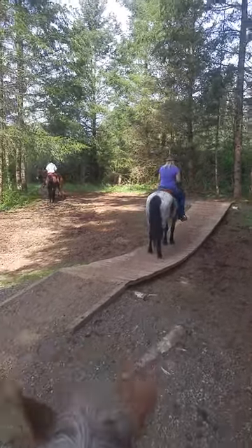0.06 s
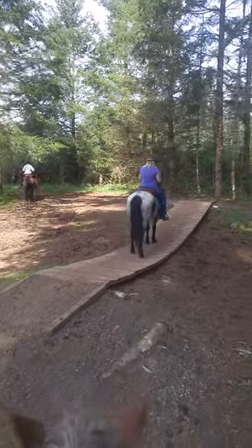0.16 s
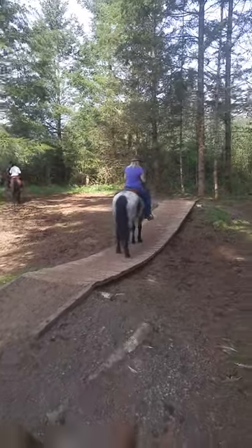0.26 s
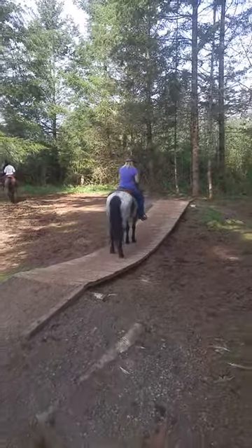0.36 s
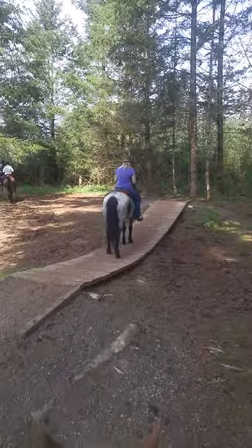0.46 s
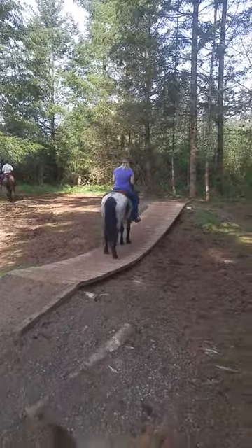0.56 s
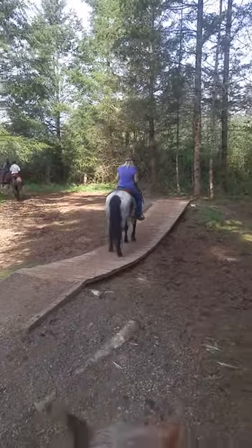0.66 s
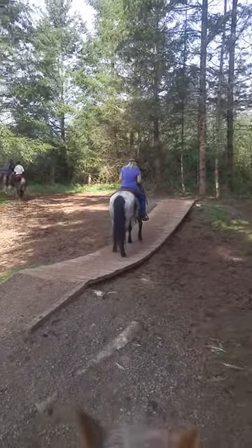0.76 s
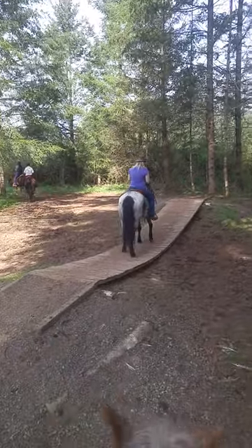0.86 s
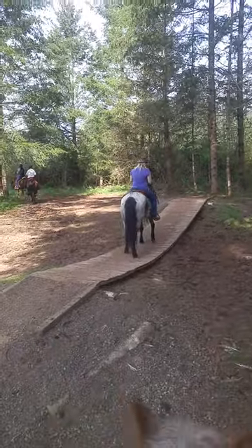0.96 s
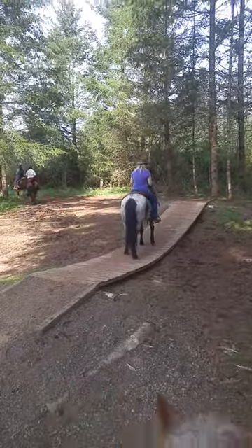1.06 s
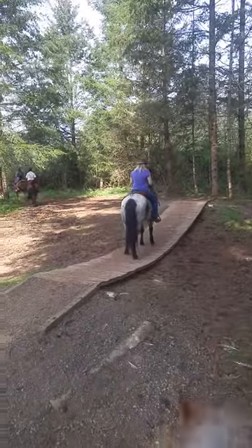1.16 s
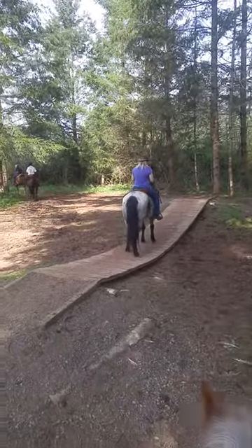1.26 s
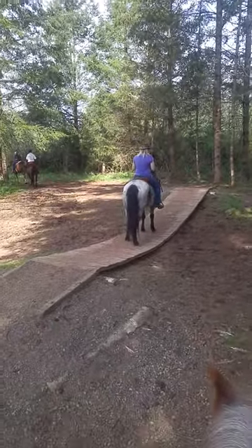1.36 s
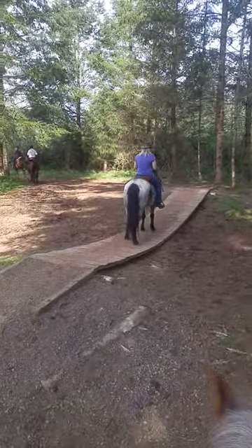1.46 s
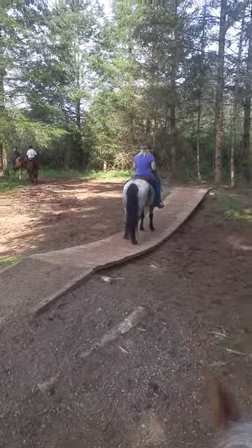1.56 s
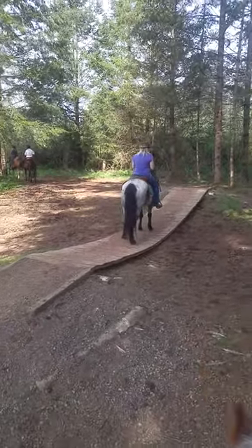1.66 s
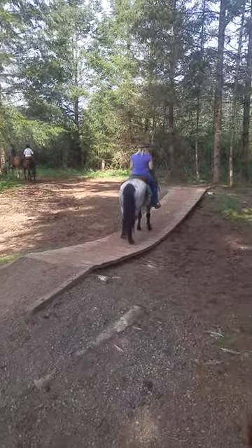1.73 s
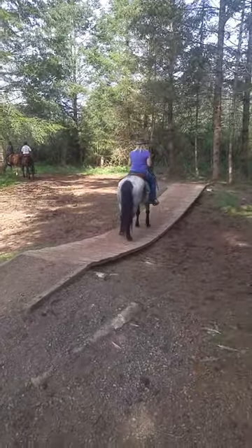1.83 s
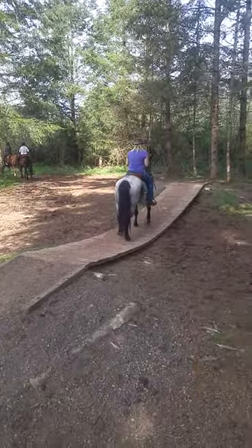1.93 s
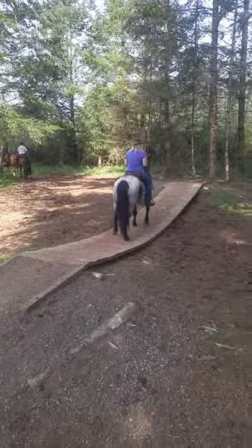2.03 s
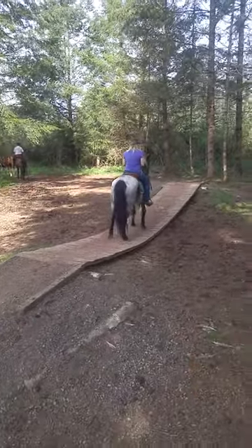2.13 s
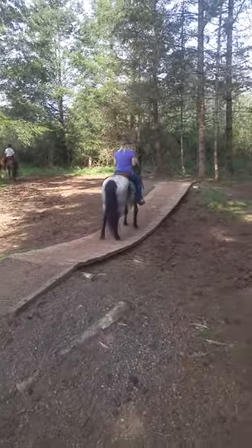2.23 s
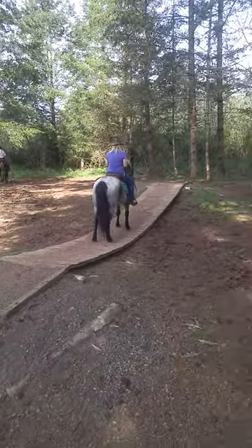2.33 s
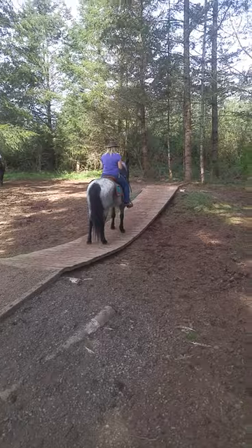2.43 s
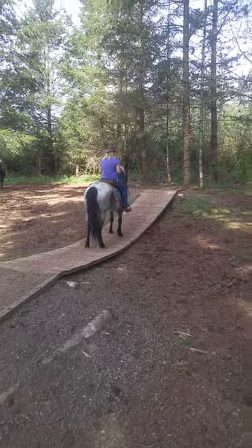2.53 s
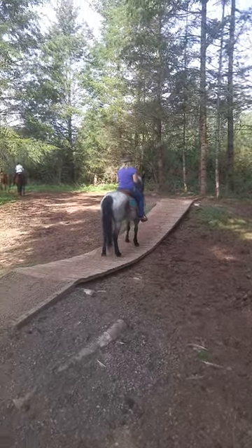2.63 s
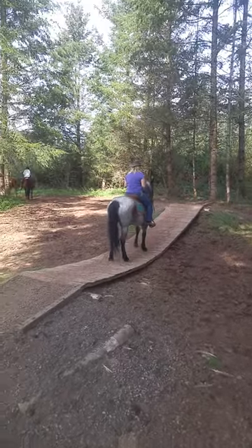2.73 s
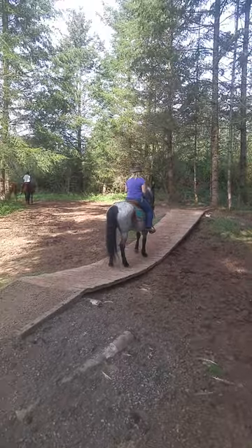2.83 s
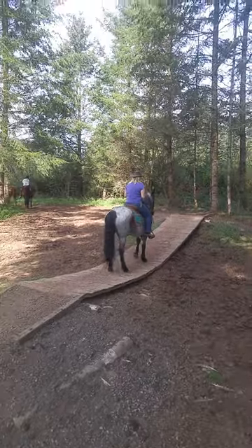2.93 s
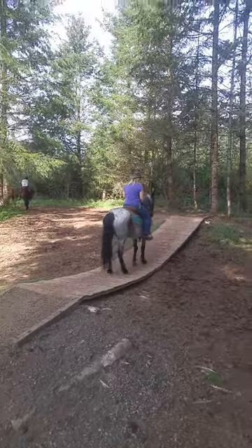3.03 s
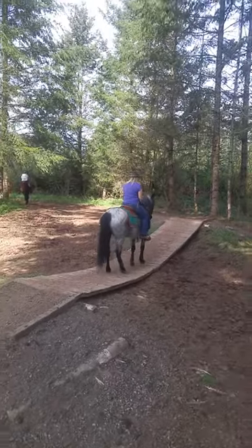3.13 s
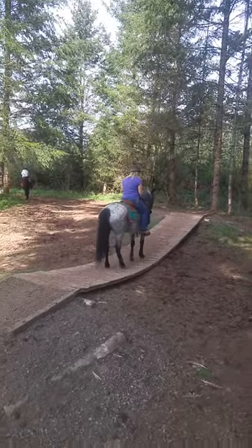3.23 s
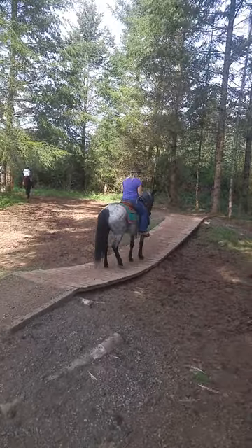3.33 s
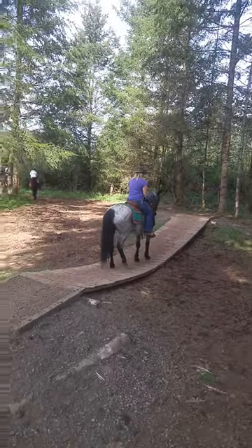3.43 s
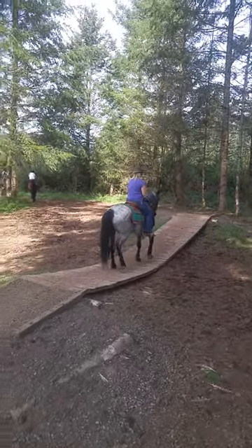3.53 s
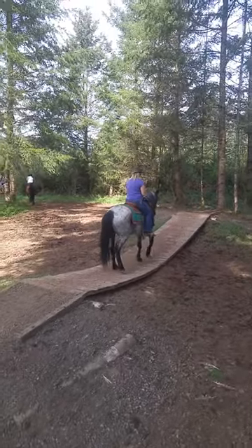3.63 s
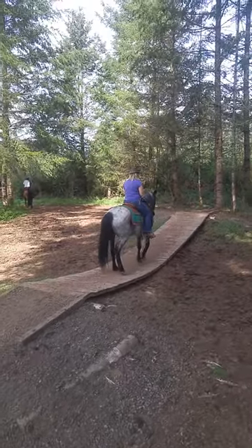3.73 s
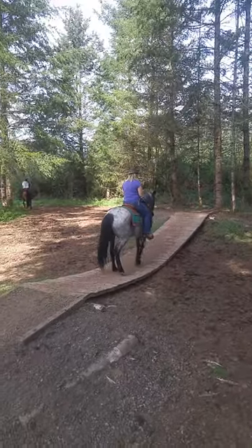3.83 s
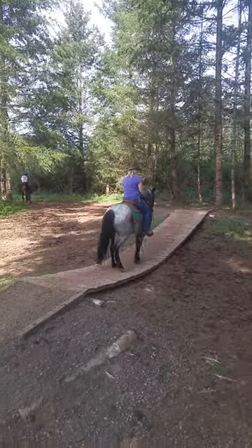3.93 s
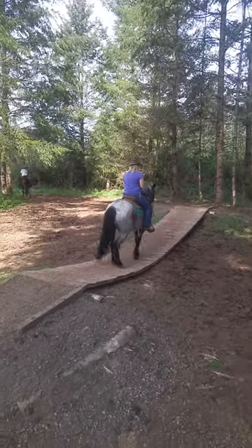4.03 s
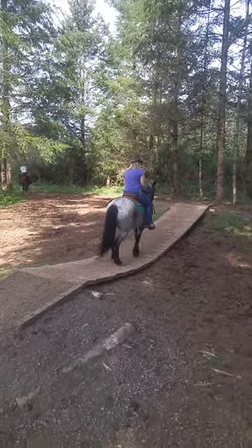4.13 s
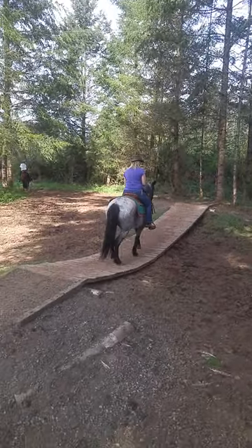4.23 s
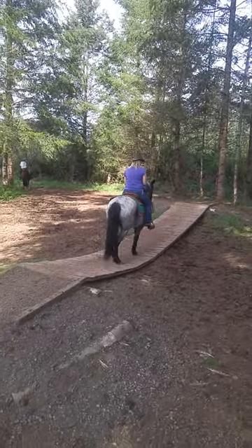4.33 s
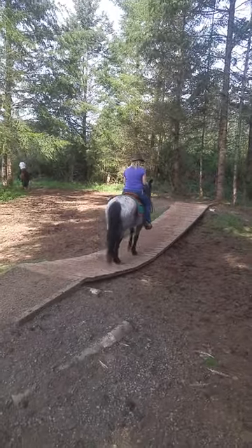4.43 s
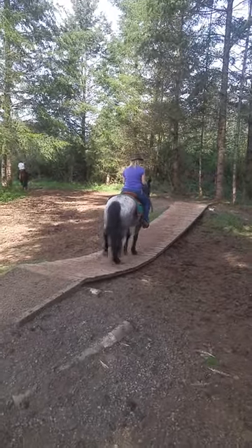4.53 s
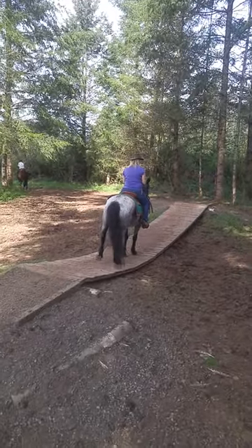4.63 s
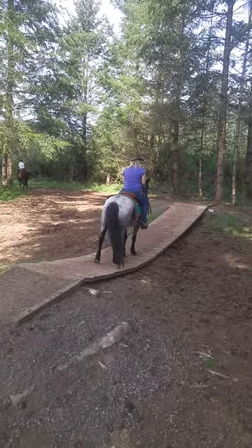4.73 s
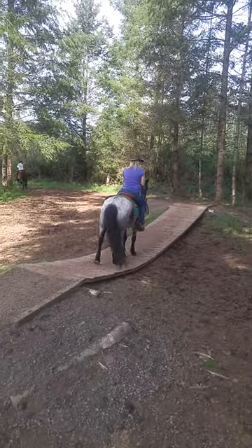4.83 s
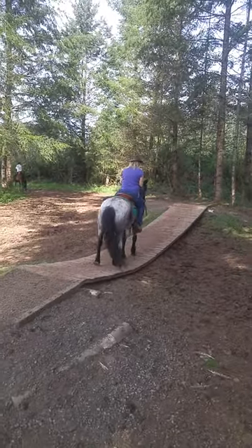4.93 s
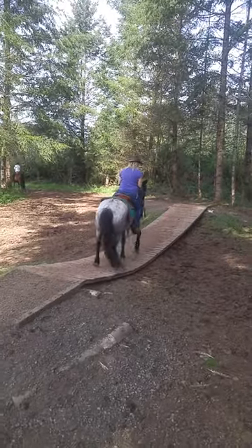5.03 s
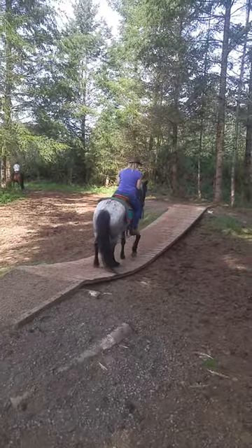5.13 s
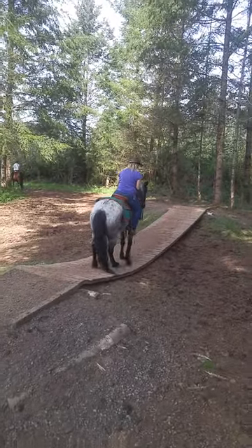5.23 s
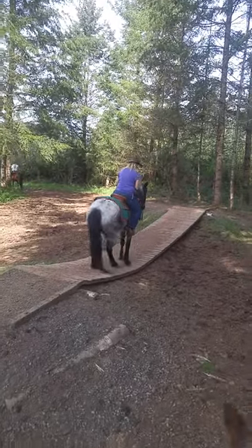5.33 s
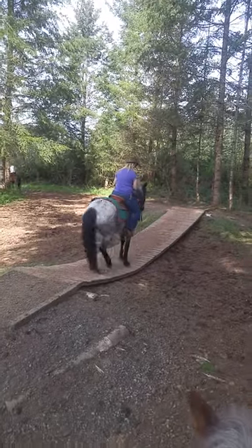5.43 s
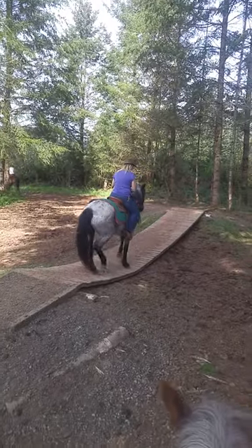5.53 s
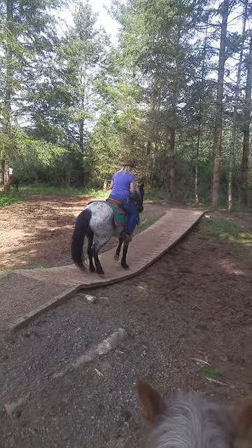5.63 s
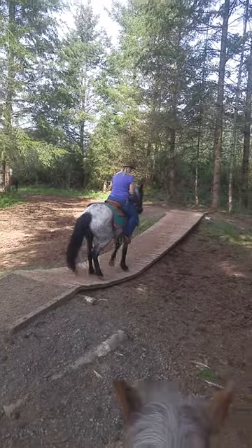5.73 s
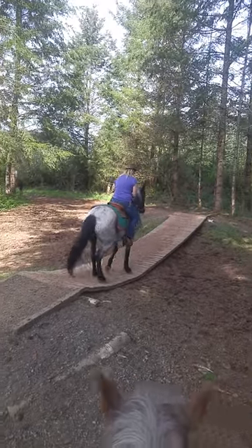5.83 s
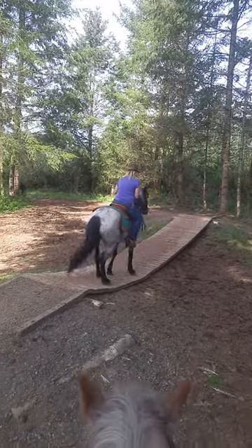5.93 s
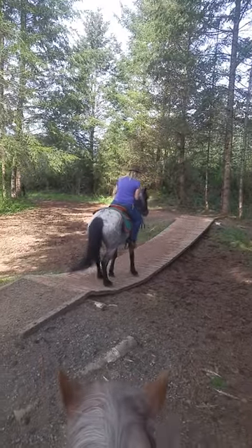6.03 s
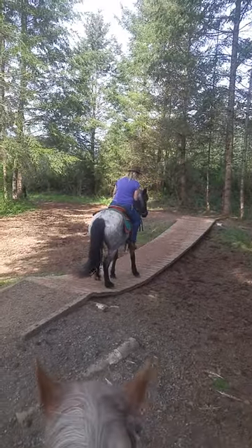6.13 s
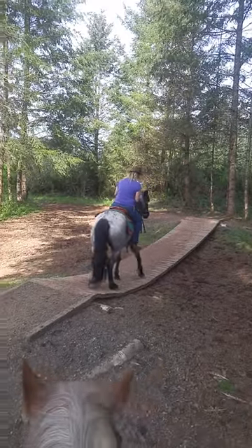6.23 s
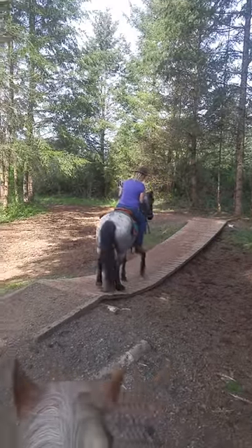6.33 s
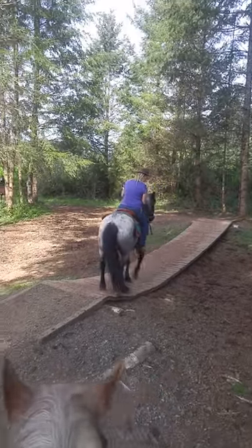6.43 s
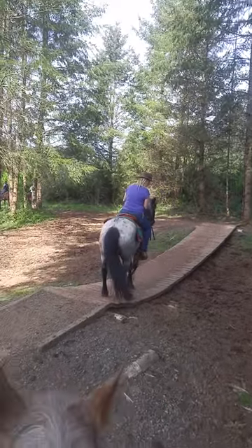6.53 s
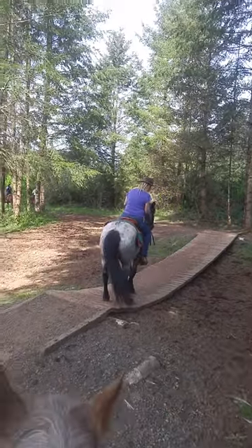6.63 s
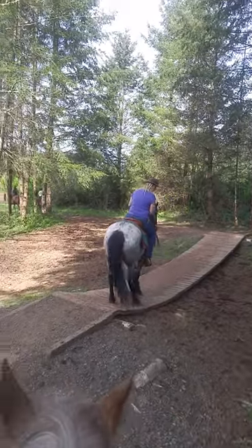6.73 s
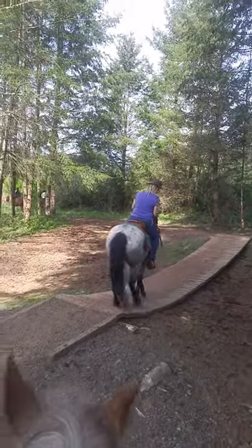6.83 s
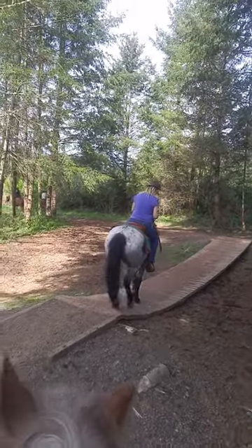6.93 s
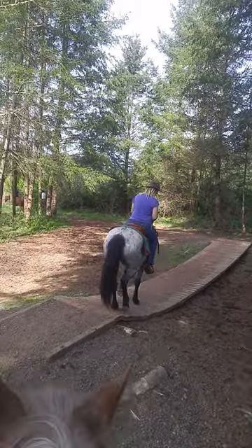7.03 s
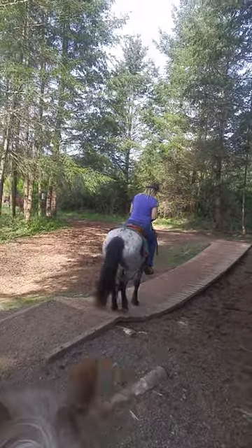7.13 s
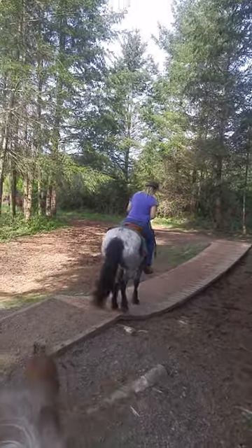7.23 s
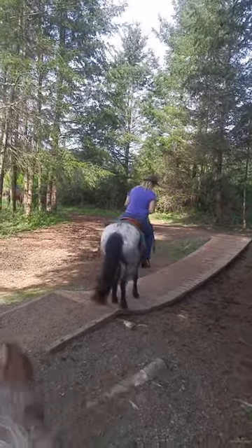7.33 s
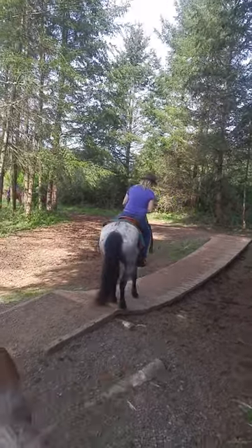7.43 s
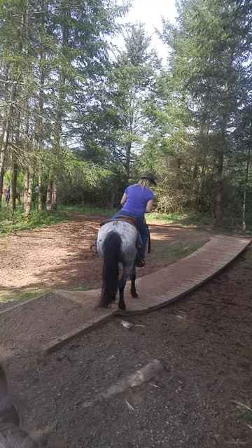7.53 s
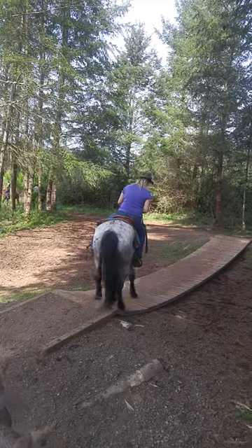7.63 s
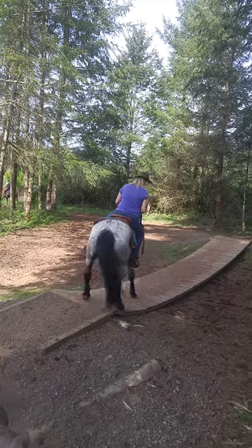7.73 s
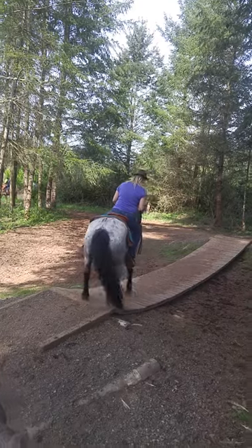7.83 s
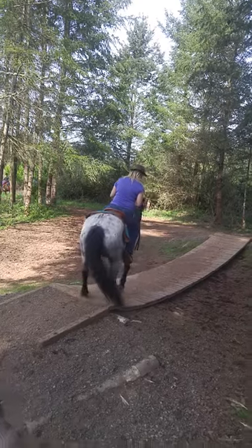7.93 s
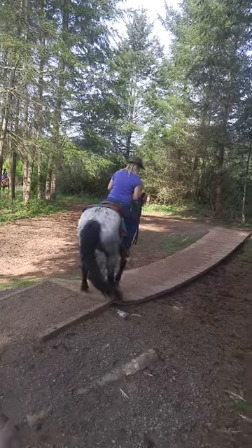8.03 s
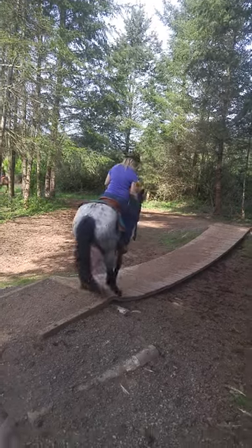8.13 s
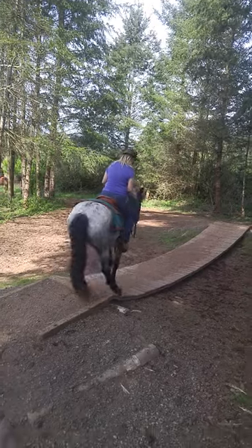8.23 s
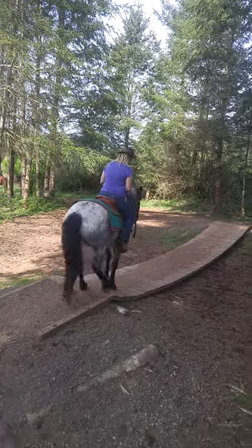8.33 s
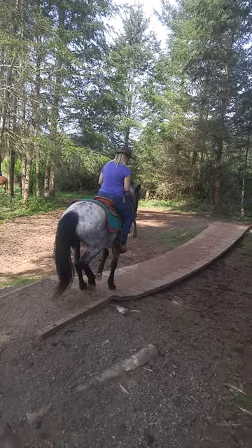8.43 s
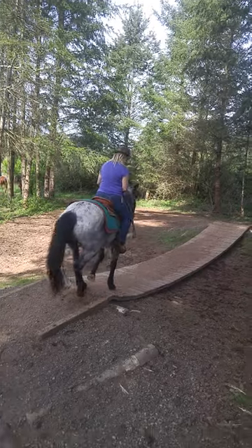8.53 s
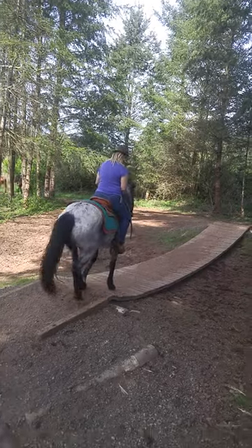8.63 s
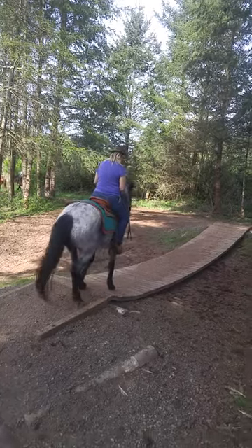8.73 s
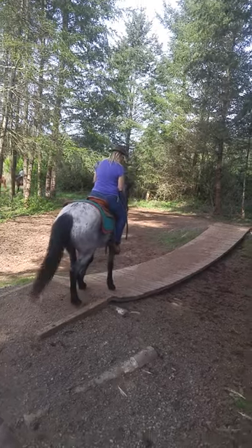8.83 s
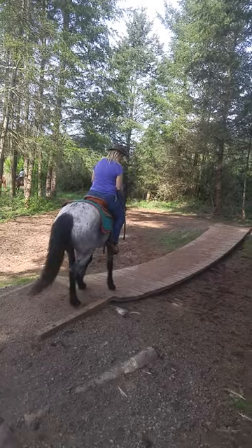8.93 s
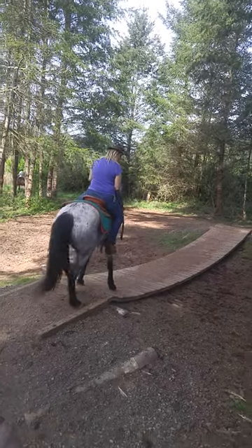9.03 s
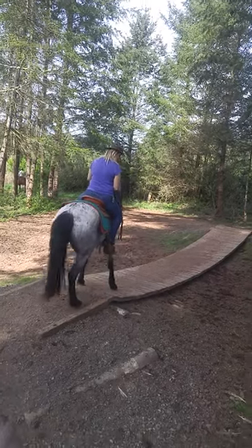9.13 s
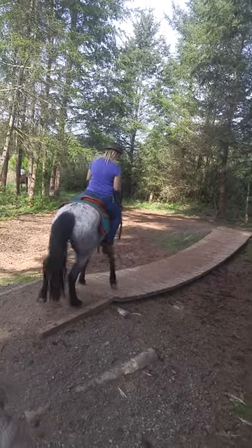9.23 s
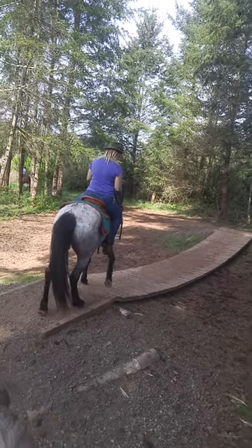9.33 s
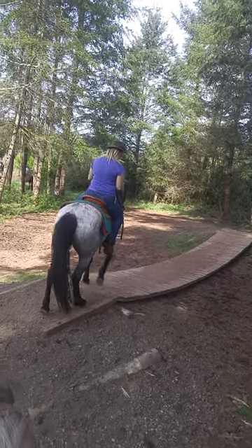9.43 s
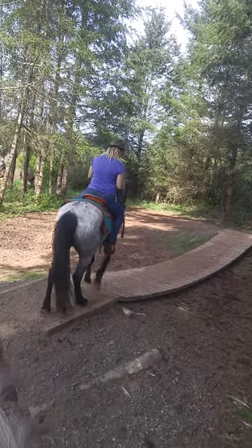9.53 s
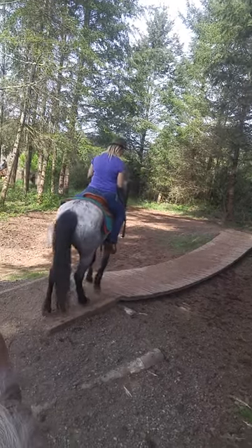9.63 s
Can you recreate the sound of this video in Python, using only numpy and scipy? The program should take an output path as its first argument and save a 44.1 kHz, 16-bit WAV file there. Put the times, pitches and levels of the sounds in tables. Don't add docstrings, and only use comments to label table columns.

```python
import sys
import numpy as np
from scipy import signal
from scipy.io import wavfile

SR = 44100
rng = np.random.default_rng(int(sys.argv[2]) if len(sys.argv) > 2 else 0)


def magnitude_from_level(level_db):
    exponent = np.asarray(level_db, float) / 20
    return 10 ** exponent


def inscribe(sig):
    pcm = np.round(np.clip(np.atleast_2d(sig).T, -1, 1) * 32767)
    wavfile.write(sys.argv[1], SR, pcm.astype(np.int16))


N = 426518


def unit(x):
    return x / np.sqrt(np.mean(x ** 2) + 1e-20)


def in_time(rows, **ends):
    s, *columns = np.transpose(rows)
    return [np.interp(np.arange(N) / SR, s, c, **ends) for c in columns]


def at_hz(points, hz):
    points_hz, values = np.transpose(points)
    return np.interp(np.log(hz), np.log(points_hz), values)


def seconds(length):
    return np.arange(int(length * SR)) / SR


def drift(rate):
    r = np.exp(-80 * np.pi * rate / SR)
    white = rng.standard_normal(N // 40 + 2002)
    slow = signal.lfilter([1], [1, -2 * r, r * r], white)[2000:]
    return np.interp(np.arange(N) / 40, np.arange(len(slow)), unit(slow))


def band(x, low_hz, high_hz):
    return signal.sosfilt(signal.butter(2, [low_hz, high_hz], "band", fs=SR, output="sos"), x)


def resonate(x, modes):
    out = 0
    for k, (hz, width, level_db) in enumerate(modes):
        r = np.exp(-np.pi * width / SR)
        b = [(1 - r * r) / 2, 0, (r * r - 1) / 2]
        a = [1, -2 * r * np.cos(2 * np.pi * hz / SR), r * r]
        out = out + (-1) ** k * magnitude_from_level(level_db) * signal.lfilter(b, a, x + 1e-18)
    return out


def struck(t, modes, chance, spread_db, detune):
    hz, level_db, t60 = np.transpose(modes)[:, :, None]
    strength, shift = chance[:len(modes), None], chance[-len(modes):, None]
    level = magnitude_from_level(level_db + spread_db * strength - 60 * t / t60)
    rings = np.sin(2 * np.pi * hz * (1 + detune * shift) * t) * level
    return np.sum(rings * np.sign(shift), axis=0)


def fade(t, rise, t60):
    shape = (1 - np.exp(-t / max(rise, 1e-4))) ** 2 * magnitude_from_level(-60 * t / t60)
    return shape / shape.max()


def add(out, s, sound, pan_db=0):
    i = round(s * SR)
    n = min(sound.shape[-1], N - i)
    out[:, i:i + n] += (sound * magnitude_from_level([[pan_db / 2], [-pan_db / 2]]))[:, :n]


def slips(per_s, spread_db):
    sizes = magnitude_from_level(spread_db * np.minimum(rng.exponential(1, N), 4)) * rng.choice([-1, 1], N)
    return sizes * (rng.random(N) < per_s / SR) + 1e-18


def hoof_noise(count, t):
    noise = rng.standard_normal((count, 3, len(t)))
    noise = noise[:, :1] + 1.45 * noise[:, 1:]
    grain_db = 2.0 * rng.exponential(1, (count, 1, len(t) // 40 + 1))
    return noise, noise * magnitude_from_level(grain_db.repeat(40, axis=2)[..., :len(t)])


def snap_bursts(rows, octaves, t60, trim_db):
    out, t = np.zeros((2, N)), seconds(0.03)
    noise = rng.standard_normal((len(rows), 3, len(t)))
    for k, (s, peak_db, hz, pan_db) in enumerate(rows):
        burst = (noise[k, 0] + 0.69 * noise[k, 1:]) * fade(t, 0.00026, t60)
        burst = band(burst, hz * 2 ** -octaves, hz * 2 ** octaves)
        add(out, s, magnitude_from_level(peak_db + trim_db) * burst / np.abs(burst).max(), pan_db)
    return out


def forest():
    # (time [s], rumble [dB], hum [dB])
    traffic = [
        (0.0, -65, -67.5),
        (2.69, -67, -71.5),
        (3.28, -67.5, -72.5),
        (4.12, -72.5, -71),
        (6.06, -73.5, -69.5),
        (9.67, -74.5, -71),
    ]
    # (frequency [Hz], level [dB per Hz])
    spectrum = [(30, -8), (92, 5.5), (197, -7.5), (399, -16.5), (720, -7.5), (2000, -33.5), (5040, -34.5),
                (15500, -37.5)]
    # (frequency [Hz], likeness [0-1])
    likeness = [(60, .99), (150, 0.99), (300, 0.9), (700, 1), (1500, 0.1), (5000, 0.045)]
    rumble_db, hum_db = in_time(traffic)
    breeze_db = 1.2 * drift(3)
    out, edges = 0, 30 * 2 ** np.arange(0, 9.2, 0.5)
    white = rng.standard_normal((2, 2, N))
    for k, (low, high) in enumerate(zip(edges, edges[1:])):
        mid, side = band(white[k % 2], low, high)
        hz = np.sqrt(low * high)
        alike = np.clip(at_hz(likeness, hz), 0, 1)
        if hz < 220:
            swell_db = rumble_db + 65.5
        elif hz < 1300:
            swell_db = hum_db + 68.5
        else:
            swell_db = breeze_db - 1.5
        gain = magnitude_from_level(at_hz(spectrum, hz) + swell_db + 3.57 * drift(10.4))
        out = out + gain * (np.sqrt(1 + alike) * mid + np.sqrt(1 - alike) * side * [[1], [-1]])
    return magnitude_from_level(-62.5 + 21.5) * out


def saddle():
    # (from [s], until [s], creak [dB], crackle [dB])
    shifts = [(0.049, 0.198, -53, -46.5), (0.21, 0.327, -44.5, -51.5), (0.393, 0.497, -58.5, -50),
              (0.49, 0.797, -65, -64), (0.812, 1.063, -52.5, -52), (1.11, 1.298, -57.5, -61.5),
              (1.362, 1.634, -54.5, -55.5), (1.65, 2.052, -62.5, -61.5), (2.052, 2.315, -60.5, -58.5),
              (2.78, 3.086, -55, -52), (3.066, 3.334, -45, -43.5), (3.346, 3.602, -50.5, -44),
              (3.576, 3.732, -60, -81), (3.75, 4.11, -58.5, -63.5), (4.473, 4.568, -68, -63),
              (4.672, 4.725, -54, -57), (4.975, 5.165, -65, -59.5), (5.337, 5.49, -59.5, -50.5),
              (5.563, 5.925, -64, -84), (6.015, 6.277, -74, -72), (6.396, 6.61, -50.5, -50.5),
              (6.59, 7.02, -56.5, -54), (7.092, 7.553, -62, -74), (7.833, 7.886, -50.5, -62),
              (8.39, 8.492, -65, -58.5), (8.803, 8.829, -61, -53), (8.88, 9.145, -94, -61),
              (9.163, 9.338, -86, -89), (9.478, 9.585, -61, -81)]
    # (frequency [Hz], width [Hz], level [dB])
    leather = [(266, 111, -4.5), (345, 78, 0.5), (425, 86, -2), (633.5, 33, 0.5), (754, 105, -6)]
    # (frequency [Hz], width [Hz], level [dB])
    strap = [(1360, 98, 22.5), (2350, 1430, 9.5), (3570, 1900, 4.5)]
    fibres_hz = [4440, 6800, 8800]
    lag = 21
    load = magnitude_from_level([[-73], [-77], [-73]]) * magnitude_from_level(3 * drift(6))
    for start, end, creak_db, crackle_db in shifts:
        i, j = round((start - 0.02) * SR), round((end + 0.0095) * SR)
        arch = np.sin(np.pi * np.linspace(0, 1, j - i) ** 0.99) ** 0.5
        rub_db = crackle_db + 0.25 * (creak_db - crackle_db) - 12.5
        load[:, i:j] += magnitude_from_level([[creak_db], [rub_db], [crackle_db]]) * np.nan_to_num(arch)
    slow = slips(260 * magnitude_from_level(3.3 * drift(12)), 0.97)
    fine = slips(1500 * magnitude_from_level(3.8 * drift(30)), 6.0)
    creak = load[0] * unit(resonate(slow, leather))
    rub = load[1] * unit(resonate(0.036 * slow + fine, strap))
    fibres = 0
    for hz in fibres_hz:
        clicks = slips(500 * magnitude_from_level(3.1 * drift(25)), 3.9)
        fibres = fibres + magnitude_from_level(2.3 * drift(6.2)) * band(clicks, hz / 1.36, hz * 1.26)
    crackle = load[2] * magnitude_from_level(-19.5) * unit(fibres)
    near = creak + rub + crackle + squeak() + groans()
    far_fibres = unit(band(slips(1600 * magnitude_from_level(2.9 * drift(28)), 7.4), 1730, 6800))
    far_side = far_fibres * load[2] * magnitude_from_level(-16.5)
    return np.array([np.roll(near, lag) + far_side, near * magnitude_from_level(1.0)])


def snaps():
    # (time [s], peak [dB], frequency [Hz], left minus right [dB])
    dull_snaps = [(0.0814, -35, 1730, 4), (0.1104, -43, 1430, 2), (0.1845, -44.5, 1610, -7),
                  (0.2083, -47, 1590, -4), (0.2364, -49, 2070, -1.0), (0.2583, -40, 1350, -1.5),
                  (0.399, -58, 1600, -4.5), (0.415, -47.5, 2140, -9), (0.4708, -51, 2100, -6),
                  (0.5593, -51.5, 1610, -1.0), (0.7073, -53, 1960, -3), (1.179, -46, 1630, -5),
                  (1.4395, -48, 2200, -9), (1.504, -48.5, 1530, -6), (1.5359, -47.5, 2140, -2.5),
                  (1.8687, -46, 2350, -4), (2.183, -41, 2000, 0.5), (2.566, -54, 2000, -4),
                  (2.7873, -49, 1520, 4), (3.0785, -51, 1410, -2.0), (3.11, -42, 1550, -7),
                  (3.1822, -45, 1890, -0.5), (3.2286, -46, 2240, 3), (3.3248, -43.5, 2270, -4),
                  (3.386, -50, 1380, -5), (3.4491, -40, 1690, -5), (3.5744, -53, 1600, -4),
                  (4.0462, -53, 1310, -3), (4.5281, -50, 1460, -8), (4.681, -47, 2550, 0),
                  (4.9062, -60, 1410, -1), (5.0634, -50, 2330, -4), (5.3844, -49, 1370, -1.0),
                  (5.748, -23.5, 1000, 0.5), (6.0497, -56, 2190, -2.5), (6.1764, -57, 2480, -0.5),
                  (6.4288, -42, 1420, -6), (6.55, -45, 1410, -7), (6.658, -44, 1580, -4),
                  (6.6965, -40.5, 1670, -4), (6.86, -49, 1820, 0), (6.9472, -52, 1860, -6),
                  (7.9054, -53.5, 3870, 0.5), (8.393, -63, 1370, 1.5), (8.9315, -49, 1460, -6),
                  (9.0285, -51, 1350, 7), (9.0982, -50.5, 1850, 2), (9.217, -51, 1320, 7),
                  (9.3066, -54.5, 2350, 5)]
    return snap_bursts(dull_snaps, octaves=0.44, t60=0.018, trim_db=-1.4)


def knocks():
    # (time [s], knock peak [dB], plank [Hz], softness: hoof
    # wall under the knock [dB])
    landings = [(0.089, -43, 880, 35), (1.868, -50, 810, 13), (2.167, -35, 652, 16), (2.229, -40, 660, 14),
                (2.804, -42.5, 696, 14.5), (3.11, -34, 605, 26), (3.718, -30, 790, 6),
                (3.923, -29, 677, 39), (4.362, -45, 610, 38), (4.526, -48.5, 720, 13.5),
                (4.838, -32.5, 713, 13), (5.341, -25.5, 772, 6), (5.7487, -10.5, 625, 36.5),
                (6.003, -34, 633, 26), (6.403, -40.5, 720, 5), (6.674, -31, 640, 22),
                (7.182, -47.5, 813, 2), (7.194, -41.5, 614, 7.5), (7.3125, -29, 616, 25),
                (7.822, -44, 754, 7), (7.8405, -33, 720, 6), (8.189, -24.5, 699, 24.5),
                (8.686, -40.5, 680, 11.5), (8.791, -38, 599, 24), (9.455, -50, 620, 13),
                (9.6693, -23, 730, 6.5), (5.771, -37, 674, 33), (5.83, -40, 660, 80), (9.504, -49, 684, 20),
                (9.539, -56, 705, 11), (9.658, -43.5, 650, 26)]
    # (multiple of its pitch [1], level [dB], t60 [s])
    plank_modes = [(0.93, 16, 0.02), (1.07, -26, 0.11), (1.27, -7, 0.046)]
    # (frequency [Hz], level [dB], t60 [s])
    wall_modes = [(912, 7.5, 0.034), (1032, -3.5, 0.05), (1220, 0, 0.04), (1240, -12, 0.03),
                  (1610, -29.5, 0.026)]
    out, t = np.zeros((2, N)), seconds(0.4)
    chance = rng.standard_normal((len(landings), 16))
    noise, grains = hoof_noise(len(landings), t)
    scatter = unit(resonate(band(noise, 478, 1250), [(616, 210, 8.5), (754, 200, 0.5)]))
    rattle = unit(band(grains, 370, 944))
    for k, (s, knock_db, hz, soft_db) in enumerate(landings):
        rise = 0.00074 + 0.0024 * soft_db / 20
        echo_db = -5 - 0.34 * soft_db
        plank = np.sin(2 * np.pi * hz * t) * fade(t, rise, 0.019)
        modes = np.multiply(plank_modes, [hz, 1, 1])
        plank = plank + struck(t, modes, chance[k, :6], 0.86, 0.015) * fade(t, rise, 9)
        note = 0.5 * scatter[k] + 0.66 * unit(resonate(noise[k], [(hz, 66, 0)]))
        tail = 0.7 * scatter[k] * fade(t, 0.003, 0.07) + magnitude_from_level(-10.5) * note * fade(t, 0.0072, 0.32)
        add(out, s, magnitude_from_level(knock_db) * (plank + magnitude_from_level(echo_db) * tail))
        wall = struck(t, wall_modes, chance[k, 6:], 1.0, 0.08) * fade(t, 0.091 * rise, 9)
        wall = wall + magnitude_from_level(-1.0) * rattle[k] * fade(t, 0.00022, 0.18)
        add(out, s + 0.001176, magnitude_from_level(knock_db - soft_db) * wall)
    return out


def deck():
    # (time [s], peak [dB], frequency [Hz], t60 [s])
    booms = [(0.091, -42, 73, 0.041), (2.167, -30.5, 99.5, 0.11), (2.235, -31, 82.7, 0.096),
             (3.107, -33, 117, 0.087), (3.718, -32.5, 72.4, 0.11), (3.926, -37, 90, 0.066),
             (4.696, -46, 83, 0.055), (4.833, -28, 72.8, 0.14), (5.339, -28, 86, 0.087),
             (5.374, -37, 67, 0.2), (5.747, -31, 79.3, 0.16), (6.007, -39, 70, 0.12),
             (6.118, -49.5, 56.5, 0.083), (6.406, -28.5, 64.6, 0.31), (6.677, -30, 68.6, 0.15),
             (6.721, -42, 69.6, 0.13), (7.197, -39.5, 62.6, 0.16), (7.317, -32.5, 66, 0.3),
             (7.569, -51, 62, 0.15), (7.842, -25, 113.2, 0.068), (8.189, -38, 77, 0.044),
             (8.219, -36.5, 70, 0.13), (8.4, -47.5, 133, 0.043), (8.686, -48, 60.6, 0.25),
             (8.786, -34.5, 70.2, 0.16), (9.455, -48.5, 63.5, 0.23)]
    out, t = np.zeros((2, N)), seconds(0.5)
    side = 0.031 * unit(band(rng.standard_normal(len(t)), 40, 200)) * [[1], [-1]]
    for s, peak_db, hz, t60 in booms:
        turns = 0.92 * hz * t + 0.47 * (1 - np.exp(-t / 0.011))
        swing = fade(t, 0.17 / hz, 3.8 * t60)
        swing = swing * (np.exp(-(t / (0.22 * t60)) ** 5.4) + 0.11)
        add(out, s + 0.0053, magnitude_from_level(peak_db + 1.5) * swing * (side - np.sin(2 * np.pi * turns)))
    return out


def sparks():
    # (time [s], peak [dB], frequency [Hz], left minus right [dB])
    bright_snaps = [(0.0913, -36, 6360, -5), (0.2094, -49, 8760, -12), (0.2364, -48, 6580, -4.0),
                    (0.258, -42, 8930, -4.5), (0.9263, -50, 6330, -9), (1.4017, -55, 8300, -13),
                    (1.5628, -50, 7000, -13), (2.1134, -55, 8740, -4.5), (2.1844, -46, 5540, 6),
                    (2.358, -56, 6420, -7), (2.9534, -46, 8860, -13), (3.0779, -46, 8200, -3.5),
                    (3.1113, -47, 8260, -12), (3.1408, -50, 8130, -11), (3.2765, -49.5, 9030, -9),
                    (3.535, -43, 8800, -12), (4.045, -52, 7950, -7), (4.354, -54, 8640, -12),
                    (4.459, -48, 8190, -2.0), (4.5744, -51, 8680, -3), (4.9516, -54, 9510, -2),
                    (5.036, -56, 8400, -8), (5.0639, -60, 8420, -7), (5.1225, -43, 6400, 0),
                    (5.3843, -46, 8200, -8), (6.05, -49, 7500, -7), (7.8425, -20.5, 1010, 8),
                    (7.1192, -51.5, 8300, -10), (7.8224, -50, 6360, 1), (8.3933, -54, 7290, 3.5),
                    (8.6862, -42, 7260, 15), (8.691, -45, 7300, 8), (8.692, -36, 3030, 8),
                    (8.7165, -40, 7260, 5), (8.7205, -44, 7550, 5), (8.9294, -52.5, 7600, 5),
                    (9.194, -55, 8410, 2), (9.502, -52, 8500, 1.5), (9.467, -58, 8400, 2)]
    return snap_bursts(bright_snaps, octaves=0.21, t60=0.017, trim_db=-5.5)


def ticks():
    # (time [s], peak [dB], lower crack [dB])
    cracks = [(0.0925, -82, -32), (0.2468, -43, -42), (0.2715, -37.5, -42), (0.9448, -43.5, -41),
              (2.7734, -46.5, -69), (2.993, -49, -43), (3.0582, -33.5, -38), (3.9414, -46, -52),
              (3.2021, -41.5, -48), (3.2894, -44, -35.5), (3.474, -48, -39), (3.5502, -35, -39),
              (3.8067, -52, -44.5), (4.7077, -63, -41.5), (5.767, -43, -40), (6.2221, -55, -48),
              (4.176, -51, -49), (6.3957, -49, -44), (6.5141, -43, -41), (6.7196, -55, -40),
              (7.8231, -45, -44), (7.842, -33, -86), (8.1495, -74, -45.5), (8.4105, -46.5, -48),
              (8.6863, -54, -46), (8.7118, -39.5, -36.5), (9.07, -46.5, -47), (9.4578, -42, -54),
              (9.5382, -52, -58), (9.65, -50, -61)]
    out, t = np.zeros((2, N)), seconds(0.06)
    stray_count, stray_db, stray_spread_db = 45, -64, 3.0
    moments = rng.uniform(0, N / SR, (stray_count, 1))
    levels_db = stray_db + stray_spread_db * rng.standard_normal((stray_count, 2))
    rows = np.vstack([cracks, np.hstack([moments, levels_db])])
    noise, sides = rng.standard_normal((len(rows), 2, len(t))), rng.standard_normal(len(rows))
    bright, lower = unit(band(noise, 5900, 9240)), unit(band(noise, 430, 2540))
    shape = fade(t, 0.0026, 0.0073) + magnitude_from_level(-15.5) * fade(t, 0.0056, 0.12)
    for k, (s, peak_db, lower_db) in enumerate(rows):
        crack = magnitude_from_level(peak_db - 9.5) * bright[k] + magnitude_from_level(lower_db - 7.5) * lower[k]
        pan_db = -6.5 if s < 7.5 else 2.5
        add(out, s, crack * shape, 0.56 * sides[k] + pan_db)
    return out


def groans():
    # (time [s], peak [dB], frequency [Hz], length [s])
    locked_slips = [(0.152, -48, 394, 0.046), (0.191, -46, 325, 0.071), (0.235, -43, 342, 0.094),
                    (0.407, -54.5, 340, 0.061), (0.524, -47.5, 319, 0.044), (0.924, -47.5, 350, 0.053),
                    (1.153, -48, 303, 0.044), (1.473, -48.5, 269, 0.074), (2.059, -44, 345, 0.06),
                    (2.105, -49, 345, 0.057), (2.875, -49.5, 350, 0.062), (2.922, -48, 305, 0.042),
                    (3.276, -45, 422, 0.027), (3.518, -44.5, 340, 0.045), (3.936, -49.5, 335, 0.071),
                    (5.611, -53.5, 370, 0.05), (6.629, -45.5, 372, 0.042), (6.73, -37, 360, 0.055),
                    (6.846, -50, 387, 0.038), (8.433, -49, 468, 0.034)]
    out, flutter, waver = np.zeros(N), magnitude_from_level(4.0 * drift(70)), drift(53)
    for s, peak_db, hz, length in locked_slips:
        i, t = round(s * SR), seconds(length)
        here = slice(i, i + len(t))
        phase = 2 * np.pi * np.cumsum(hz * (1 + 0.051 * waver[here])) / SR
        tone = np.sin(phase) + 0.32 * np.sin(2 * phase)
        out[here] += magnitude_from_level(peak_db) * np.sin(np.pi * t / length) ** 2 * flutter[here] * tone
    return out


def engine():
    # (time [s], frequency [Hz], level [dB])
    high_order = [
        (0.35, 186, -78),
        (0.45, 175.9, -60),
        (1.15, 194, -63.5),
    ]
    # (time [s], frequency [Hz], level [dB])
    low_order = [
        (0.3, 104, -74),
        (1.464, 133.1, -66),
        (1.8, 109, -94),
    ]
    out = 0
    for rows, octave_db in ((high_order, -8), (low_order, -25)):
        hz, level_db = in_time(rows, left=-120, right=-120)
        phase = 2 * np.pi * np.cumsum(hz) / SR
        tone = np.sin(phase) + magnitude_from_level(octave_db) * np.sin(2 * phase)
        out = out + magnitude_from_level(level_db + 2.0 + 4.5 * drift(5.6)) * tone
    return out


def buckle():
    # (time [s], peak [dB], freedom to ring [0-1], loudest ring [Hz])
    clinks = [(1.718, -54, 0.75, 8390), (2.0946, -54, 0.6, 9640), (3.862, -49, 0.4, 6320),
              (3.96, -55, 1, 7360), (4.4294, -39, 0.0, 9500), (4.544, -40.5, 0, 9380),
              (4.55, -41, 0.05, 12200), (4.8205, -33.5, 0, 9340), (4.826, -37, 0.91, 9790),
              (4.963, -54, 0.5, 9500), (4.9843, -41, 0.2, 11640), (5.0948, -55.5, 0.0, 9500),
              (5.709, -52.5, 0.5, 8900), (2.096, -55, 0.8, 10340)]
    # (frequency [Hz], level [dB], t60 [s])
    steel = [(3840, -4.5, 0.025), (5450, 3, 0.029), (6240, -1, 0.033), (6360, 0, 0.034), (6740, 2.5, 0.12),
             (8660, 1.5, 0.045), (9340, 2, 0.088), (9510, 7, 0.065), (9790, -13, 0.1), (10200, -24, .055),
             (11640, 2, 0.022), (12000, 5, 0.026), (13400, -17, 0.05), (14250, -5, 0.04)]
    out, t = np.zeros((2, N)), seconds(0.2)
    chance = rng.standard_normal((len(clinks), 28))
    noise = rng.standard_normal((len(clinks), 2, len(t)))
    crack, rattle = unit(band(noise, 5000, 11000)), magnitude_from_level(2.5 * unit(band(noise, 80, 600)))
    for k, (s, peak_db, free, hz) in enumerate(clinks):
        damping = magnitude_from_level(-60 * t * (1 - np.clip(free, 0, 1)) / 0.041)
        loudest = magnitude_from_level(9.0 - 60 * t / 0.15) * np.sin(2 * np.pi * hz * t)
        rings = np.array([struck(t + lag, steel, chance[k], 4, 0.004) + loudest for lag in (0, 1.1e-4)])
        crack_shape = fade(t, 0.00052, 0.0082) + 0.13 * fade(t, 0.0038, 0.13)
        tap = rings * damping * rattle[k] + magnitude_from_level(1.5) * crack[k] * crack_shape
        add(out, s, magnitude_from_level(peak_db - 15.0) * tap, pan_db=-11.5)
    return out


def joists():
    # (time [s], joist peak [dB], joist [Hz], other joists [dB], grit [dB])
    blows = [(1.868, -50, 183, -10, -79), (2.165, -39.5, 190, 0, -69), (2.233, -39.5, 216, -8, -76),
             (2.57, -47.5, 335, -3, -80), (3.107, -37, 144, -4, -64), (3.718, -36, 420, 0.5, -56),
             (3.923, -31, 358, -8.5, -63), (4.36, -49.5, 434, -3, -85), (4.699, -62, 144, -9, -46.5),
             (4.837, -29, 425, -2, -57), (5.3415, -26, 202, -10.5, -46.5), (5.746, -26, 411, -5, -46.5),
             (6.006, -39.5, 444, -3.5, -63), (6.406, -28, 211.3, -7, -62), (6.675, -34.5, 198, -1.5, -66),
             (7.193, -36, 166, -2, -60), (7.314, -35.5, 209, -2.5, -75), (7.841, -26.5, 298.4, -6.5, -64),
             (8.188, -36.5, 152, -2.5, -54), (8.418, -43.5, 156, -14, -62), (8.688, -48, 175, -9, -36),
             (8.791, -31.5, 173, -6, -66), (9.214, -48.5, 404, -8, -61), (9.457, -53.5, 176, 0, -54),
             (9.6695, -22.5, 302, -4, -59)]
    # (frequency [Hz], level [dB], t60 [s])
    thud_modes = [(175, -6.5, 0.21), (228.2, 1, 0.079), (285.3, -9.5, 0.19), (350, 9, 0.033),
                  (425, -0.5, 0.096)]
    # (frequency [Hz], width [Hz], level [dB])
    grit_colour = [(1690, 2000, 6), (2700, 690, 11.5), (3480, 105, 12.5), (7360, 2700, -2)]
    out, t = np.zeros((2, N)), seconds(0.4)
    chance = rng.standard_normal((len(blows), 10))
    _, grains = hoof_noise(len(blows), t)
    grit = unit(band(resonate(grains, grit_colour), 600, 16000))
    slap = unit(band(grains, 330, 610))
    grit_shape = fade(t, 0.00061, 0.017) + magnitude_from_level(-15.0) * fade(t, 0.0092, 0.11)
    for k, (s, joist_db, hz, others_db, grit_db) in enumerate(blows):
        thud = np.sin(2 * np.pi * hz * t) * magnitude_from_level(-60 * t / 0.11)
        thud = thud + magnitude_from_level(others_db) * struck(t, thud_modes, chance[k], 0.26, 0.123)
        thud = thud + magnitude_from_level(-5.0) * slap[k] * magnitude_from_level(-60 * t / 0.073)
        crunch = magnitude_from_level(grit_db - 1.0) * grit[k] * grit_shape
        add(out, s, magnitude_from_level(joist_db - 1.0) * thud * fade(t, 0.0011, 8.3) + crunch)
    return out


def squeak():
    # (time [s], frequency [Hz], level [dB])
    glide = [
        (6.19, 210, -74),
        (6.238, 282, -49.5),
        (6.29, 350, -68),
    ]
    hz, level_db = in_time(glide, left=-120, right=-120)
    return magnitude_from_level(level_db + 5.5) * np.sin(2 * np.pi * np.cumsum(hz) / SR)


def scene():
    close = saddle() + snaps() + sparks() + ticks() + buckle()
    bridge = knocks() + deck() + joists()
    return forest() + engine() + close + bridge


def roll_off(x):
    return signal.sosfilt(signal.butter(12, 15790, fs=SR, output="sos"), x)


def record(dry):
    x = dry - resonate(dry, [(520, 50, 0.76)]) + resonate(dry, [(8650, 1730, 1.1)])
    x = signal.sosfilt(signal.butter(2, 40, "high", fs=SR, output="sos"), x)
    x = signal.sosfilt(signal.cheby2(10, 30, 1.02 * 15790, fs=SR, output="sos"), x)
    return roll_off(x)


dry = scene()
out = record(dry)
inscribe(out)
```